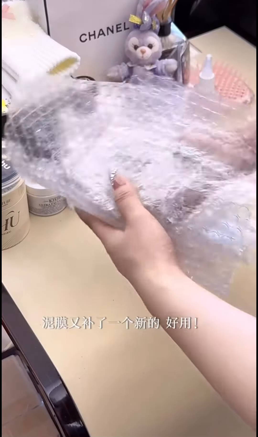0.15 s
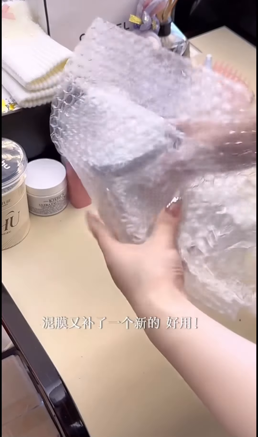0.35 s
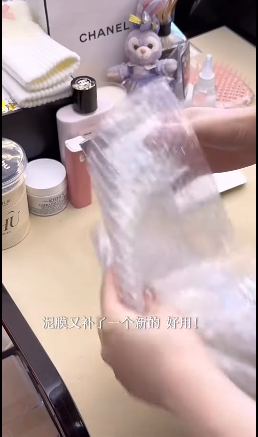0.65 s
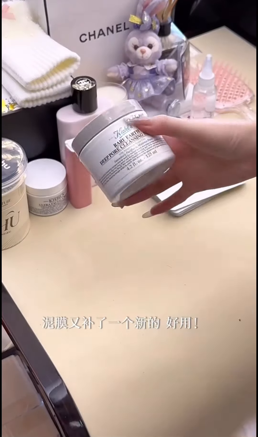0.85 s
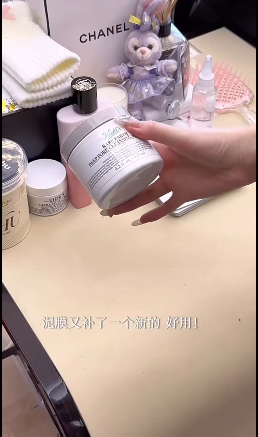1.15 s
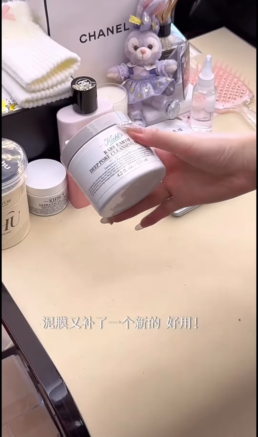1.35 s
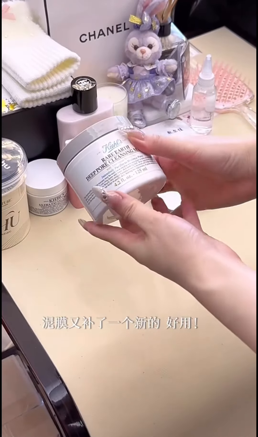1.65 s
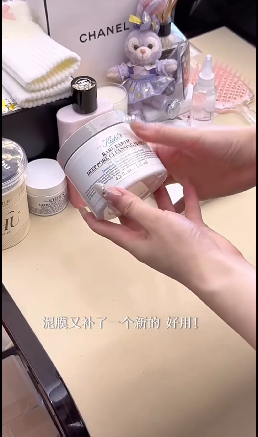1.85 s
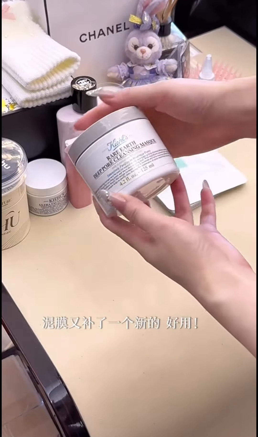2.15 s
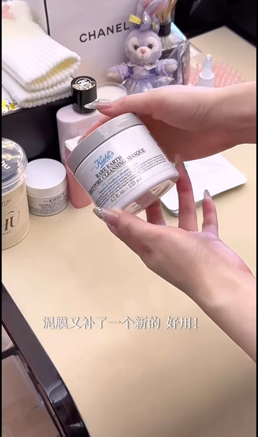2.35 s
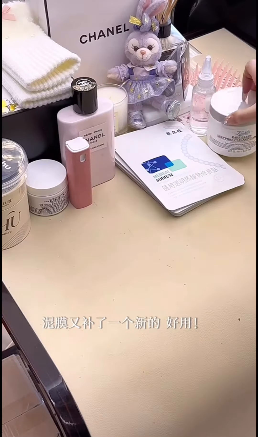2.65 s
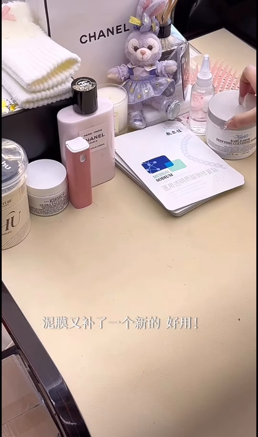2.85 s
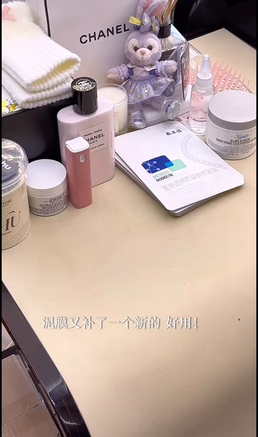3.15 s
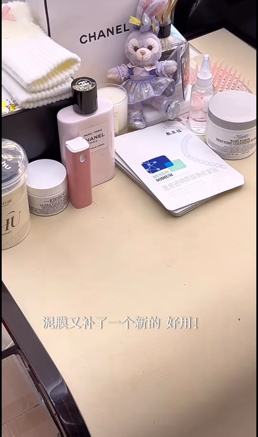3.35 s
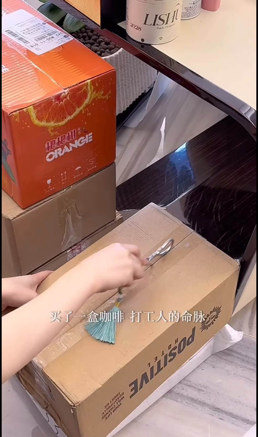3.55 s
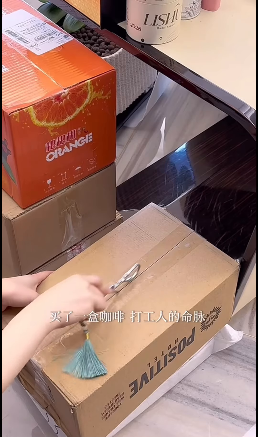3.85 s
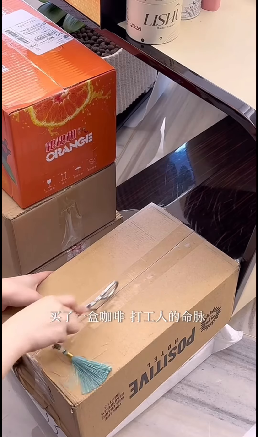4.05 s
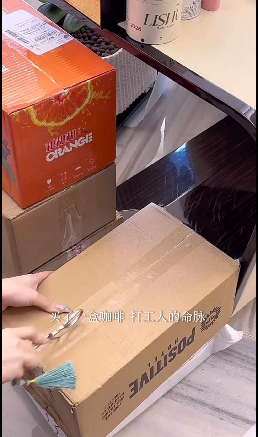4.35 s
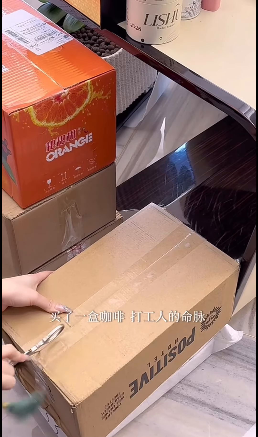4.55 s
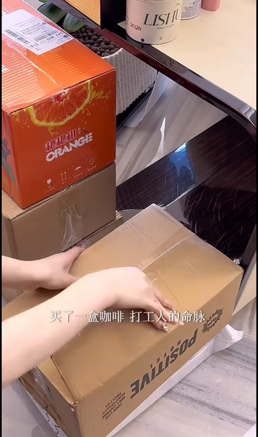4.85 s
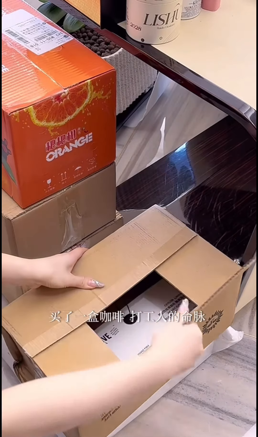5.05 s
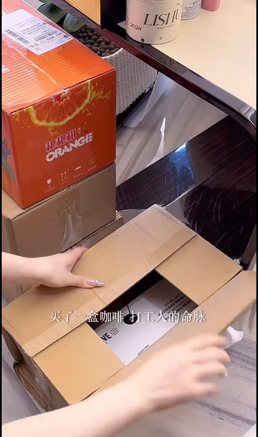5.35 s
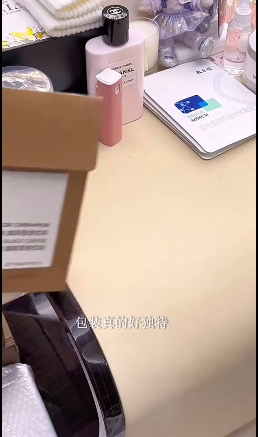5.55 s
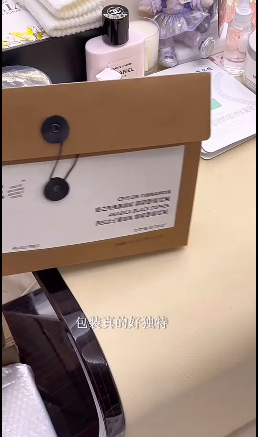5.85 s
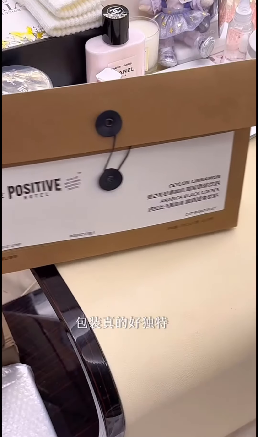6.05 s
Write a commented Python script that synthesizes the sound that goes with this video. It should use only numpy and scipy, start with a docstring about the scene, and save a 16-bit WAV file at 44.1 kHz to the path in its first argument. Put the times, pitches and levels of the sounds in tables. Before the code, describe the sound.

A close stereo microphone catches an unboxing at a desk. Bright plastic crackle comes first, then sparse nail clicks and small dull bumps of a jar. A louder section follows: hollow cardboard knocks, drumming, stick-slip sawing and tape hiss, ending in a sharp tear. Flaps scrape open, smooth packing rustles briefly, then a tick and dry paper slide, with dull room air underneath.

```python
"""Bubble wrap crackles close by as it is pulled off a cream jar; long nails tick on the jar and it is set
down. A small knife saws through the tape of a cardboard box, flaps tear loose and slide open, packing
film rustles, and a stiff paper folder is turned in the hand. Rustles and rubs are crowds of tiny clicks,
knocks are short pushes that set fading tones ringing, and a low rumble and dull air lie underneath."""
import sys
import numpy as np
from scipy import signal
from scipy.fft import rfft, irfft
from scipy.io import wavfile
from scipy.ndimage import uniform_filter1d

SR = 44100
rng = np.random.default_rng(int(sys.argv[2]) if len(sys.argv) > 2 else 0)


def wrap_up_sound(samples):
    """Save the sound to the file named by the first command line argument, as 16-bit audio."""
    columns = np.atleast_2d(samples).T
    # keep every value between -1 and 1, then stretch to whole-number steps
    tamed = np.clip(columns, -1, 1)
    steps = np.round(tamed * 32767).astype(np.int16)
    wavfile.write(sys.argv[1], SR, steps)


N = 272538
TIME = np.arange(N) / SR


def gain_of(db):
    """Turns decibels into a factor for the wave."""
    return 10 ** (np.asarray(db) / 20)


def evened(x):
    """Scales a sound to an average (rms) size of 1."""
    return x / np.sqrt(np.mean(x ** 2) + 1e-20)


def held(x, length):
    """Scales a burst so its energy equals that of an rms of 1 lasting the given length [s]."""
    return x / np.sqrt(np.sum(x ** 2) / (length * SR) + 1e-20)


def read(points, hz):
    """Reads a (frequency, value) table between its points, on a log-frequency axis."""
    f, value = np.transpose(points)
    return np.interp(np.log(hz + 1), np.log(f + 1), value)


def add(mix, s, sound):
    """Mixes a sound in at time s [s]."""
    part = mix[max(round(s * SR), 0):][:len(sound)]
    part += sound[:len(part)]


def colour(x, points, tilt_db=0, size=4096):
    """Filters with a (frequency, level) table, tilted in dB per octave, without sounding ahead of time."""
    hz = abs(np.fft.fftfreq(size, 1 / SR))
    level_db = np.maximum(read(points, hz), -80)
    level_db = level_db + tilt_db * np.log2(np.maximum(hz, 150) / 1000)  # no tilt at 1 kHz
    log_gain = np.log(gain_of(level_db))
    taps = np.fft.ifft(np.exp(np.conj(signal.hilbert(log_gain)))).real  # minimum phase
    return signal.oaconvolve(x, taps[:size // 2])[:len(x)]


def drift(n, per_s):
    """A wandering curve: random points, per_s of them each second, joined by straight lines."""
    knots = rng.standard_normal(n // 32 + 2)
    return np.interp(np.arange(n) * per_s / SR, np.arange(len(knots)), knots)


def snaps(n, per_s, spread_db):
    """Scattered clicks pushing either way, a few of them much larger."""
    size = gain_of(spread_db * np.minimum(rng.exponential(1, n), 3.5))
    happens = rng.random(n) < per_s / SR
    return size * rng.choice([-1, 1], n) * happens


def crackle(n, per_s, spread_db, cycles=2.86, count=20):
    """Snaps ring small facets of a sheet, low to high, for a few cycles; bare snaps are mixed in."""
    t, out = np.arange(512) / SR, np.zeros(n)
    for hz in np.geomspace(700, 15000, count):
        facet = np.exp(-t * hz / cycles) * np.sin(2 * np.pi * hz * t)
        clicks = snaps(n, per_s / count, spread_db)
        out += signal.oaconvolve(clicks, np.sqrt(hz) * evened(facet))[:n]
    return evened(evened(out) + 1.4 * evened(snaps(n, per_s, spread_db)))


def reshape(x, patch_db):
    """A sheet that bends changes its resonances: patches of the spectrum swell and sink."""
    z = signal.stft(x, nperseg=512, noverlap=384)[2]
    patches = rng.standard_normal(z.shape[::-1]).T
    blur = np.outer(np.hanning(12), np.hanning(20))  # over frequency, over time
    patches = evened(signal.fftconvolve(patches, blur, "same"))
    return signal.istft(z * gain_of(patch_db * np.tanh(patches)), nperseg=512, noverlap=384)[1][:len(x)]


def rub(points, per_s, spread_db, clump_db, patch_db):
    """Friction: crackle that comes in clumps, with the shifting colour of the material."""
    clumps = crackle(N, per_s, spread_db) * gain_of(clump_db * drift(N, 130))
    return evened(colour(reshape(clumps, patch_db), points))


def stroke(length, fall, size=6000):
    """Loudness curve of a burst: a quick rise, a hold and a dying tail."""
    t = np.arange(size) / SR
    return np.minimum(t / 0.00039, 1) * np.exp(-np.maximum(t - length, 0) / fall)


def ring(modes, detune=0.044, size=6000):
    """Fading tones of a struck thing; each place of contact shifts them a little."""
    t, out = np.arange(size) / SR, 0
    for hz, db, t60 in modes:
        shifted_hz = hz * (1 + detune * (2 * rng.random() - 1))
        out = out + gain_of(db - 60 * t / t60) * np.sin(2 * np.pi * shifted_hz * t)
    return out


def blows(rows, modes):
    """A soft, long contact wakes only the low tones; a hard, short one wakes them all."""
    out, t = np.zeros(N), np.arange(1024) / SR
    for s, db, contact in rows:
        u = 2 * np.pi * t / contact
        sound = signal.fftconvolve(ring(modes), u * np.exp(-u))
        sound = colour(sound, [(30, -9.5), (140, 5.0), (15000, 2.0)])  # small panels give little bass
        add(out, s, gain_of(db) * sound / abs(sound).max())
    return out


def move(start, rise, hold, db, release_db_per_s):
    """Loudness of one hand movement: it gathers speed, holds and dies away."""
    t = TIME - start
    gathering = np.clip(t / max(rise, 1e-3), 0, 1)
    return gathering * gain_of(db - release_db_per_s * np.maximum(t - rise - hold, 0))


def moves(rows, release_db_per_s):
    """Several movements of one material, adding in power."""
    return np.sqrt(sum(move(*row, release_db_per_s) ** 2 for row in rows))


# Sound colour of the bubble wrap and of the thin film: (frequency [Hz], level [dB])
WRAP_COLOUR = [(59, -24), (100, -14), (287, 0.5), (326, -4), (429, -2), (861, -4), (1800, 0), (4190, -3.5),
               (6260, -3), (7410, -6), (8230, 0), (8950, -8), (15500, -10.5)]
FILM_COLOUR = [(59, -53), (100, -20), (143, -27), (166, -4), (447, -1), (742, -6), (1520, -3), (2520, -6),
               (3180, 1), (5070, -9), (6390, 1), (8230, -0.5), (15500, -12.5)]
# Pulls on the wrap, the loose sheet creaking while it is held, and grabs at thin film and tape:
# (start time [s], rise [s], hold [s], level [dB])
WRAP_PULLS = [(0.01, .03, .24, -28.5), (0.27, 0.022, 0.1, -17.5), (0.485, 0.01, 0.033, -19.5),
              (0.57, 0.02, 0.015, -28.5), (0.98, 0.04, 0.087, -26.5), (1.252, .008, 0.081, -28.5)]
WRAP_LOOSE = [(0.0, 0.0067, 1.545, -40.5)]
FILM_GRABS = [(3.335, 0.011, 0.257, -31), (3.47, 0.028, 0.025, -24.5)]
# Folds of plastic and tape collapsing: (time [s], level [dB], length [s], brightness [dB per octave])
CRUMPLES = [(0.037, -12, 0.0033, 1.5), (0.063, -19.5, 0.0076, 6.5), (0.343, -20.5, 0.03, -1),
            (0.407, -19.5, 0.013, -1.5), (0.614, -27.5, 0.015, -5), (0.633, -19, 0.0043, 1.5),
            (0.707, -30, 0.012, -2), (0.804, -25, 0.01, -1), (1.093, -26, 0.017, -3),
            (1.255, -26.5, 0.025, -4.5), (1.307, -24.5, 0.013, 5), (1.363, -25.5, 0.038, -1),
            (3.346, -19.5, 0.0023, 4.5), (3.41, -19, 0.0031, 4), (3.421, -18, 0.0077, 1.5),
            (3.434, -16.5, 0.014, 1.5), (3.499, -17.5, 0.015, 0), (3.515, -16, 0.015, 10),
            (4.29, -23.5, 0.008, -0.5), (4.574, -27, 0.0096, 5.5), (4.632, -17.5, 0.0025, -2.5),
            (4.858, -37, 0.039, -3.5), (4.896, -31, 0.031, 15)]
WRAP_SETTLE_DB_PER_S, FILM_SETTLE_DB_PER_S = 114, 350  # the wrap goes on rustling longer


def plastic():
    """Wrap and film rustle as they move, and now and then a fold collapses."""
    out = moves(WRAP_PULLS + WRAP_LOOSE, WRAP_SETTLE_DB_PER_S) * rub(WRAP_COLOUR, 6000, 2.34, 0.95, 2.9)
    out += moves(FILM_GRABS, FILM_SETTLE_DB_PER_S) * rub(FILM_COLOUR, 12000, 5.9, 1.0, 1.8)
    for s, db, length, tilt_db in CRUMPLES:
        shape = stroke(length, 0.0031)
        fold = colour(shape * crackle(len(shape), 12000, 2.8), WRAP_COLOUR, tilt_db)
        add(out, s, gain_of(db) * held(fold, length))
    return out


# Sound colour of the low rumble and of the room's air: (frequency [Hz], level [dB])
RUMBLE_COLOUR = [(20, -31), (45, -6.5), (85, 1.5), (130, -0.5), (220, -13.5), (500, -48.5)]
AIR_COLOUR = [(60, -6), (140, 1), (300, -3), (600, -10.5), (1200, -21.5), (2500, -36), (7000, -38),
              (15000, -84)]
# Air pushed at the microphone as the wrap is swung aside: (start time [s], rise [s], hold [s], level [dB])
SWING = [(.56, .06, 0.32, -37.5)]
SWING_RELEASE_DB_PER_S = 58
RUMBLE_DB, RUMBLE_WAVER_DB, RUMBLE_WAVERS_PER_S = -41, 3, 6


def background():
    """A low rumble, stronger during the swing, under dull, wavering air; both are filtered noise."""
    swell = gain_of(RUMBLE_DB + RUMBLE_WAVER_DB * drift(N, RUMBLE_WAVERS_PER_S))
    loudness = np.hypot(swell, moves(SWING, SWING_RELEASE_DB_PER_S))
    rumble = loudness * evened(colour(rng.standard_normal(N), RUMBLE_COLOUR))
    air = evened(colour(rng.standard_normal(N), AIR_COLOUR))
    return rumble + gain_of(-42.5 + 0.81 * drift(N, 12)) * air


# Skin, plastic and board catching with a scuff or a faint squeak:
# (time [s], level [dB], length [s], centre [Hz], width [Hz])
SCUFFS = [(0.054, -30, 0.025, 2840, 700), (0.302, -37, 0.143, 452, 250), (0.143, -32, 0.062, 2290, 450),
          (1.068, -38, 0.037, 830, 398), (1.254, -33, 0.18, 400, 403), (2.29, -42.5, 0.14, 380, 397),
          (2.64, -55.5, 0.224, 1173, 30), (2.72, -37.5, 0.052, 580, 300), (3.04, -62, 0.26, 1130, 30),
          (3.203, -48.5, 0.068, 2040, 800), (3.29, -41.5, 0.035, 2040, 895), (3.411, -35.5, 0.17, 416, 160),
          (3.762, -29, 0.247, 410, 200), (4.25, -35, 0.31, 757, 171)]


def scuffs():
    """Short rubs: tiny snaps, each run heard through one resonance."""
    out = np.zeros(N)
    for s, db, length, hz, width_hz in SCUFFS:
        n = int(length * SR)
        edges = [max(hz - width_hz / 2, 40), hz + width_hz / 2]
        band = signal.butter(2, edges, "bandpass", fs=SR, output="sos")
        scuff = signal.sosfilt(band, snaps(n, 4000, 5.1)) * signal.windows.tukey(n, .5)
        add(out, s, gain_of(db) * evened(scuff))
    return out


# Sound colour of fingers on the jar and of the ticks: (frequency [Hz], level [dB])
FINGER_COLOUR = [(150, 8), (400, 22.5), (900, 12), (2200, 11), (3500, 8), (6300, 1.5), (9500, -0.5),
                 (15000, -11)]
TICK_COLOUR = [(200, 13), (700, 15), (1500, 2.5), (2800, 5), (4500, -7.5), (6500, -9.5), (10000, -22.5),
               (15500, -37)]
# Fingers shifting their grip, and skin resting on the jar: (start time [s], rise [s], hold [s], level [dB])
GRIPS = [(1.85, 0.023, 0.026, -54.5), (2.15, 0.016, 0.051, -53.5), (2.295, 0.011, 0.017, -49),
         (2.42, 0.0044, 0.032, -46.5), (2.70, 0.026, 0.029, -46.5), (3.06, 0.053, 0.025, -47.5),
         (3.19, 0.13, .03, -41)]
JAR_HELD = [(1.553, 0.079, 1.6, -64)]
# Nails and jar clicking: (time [s], level before a 12 dB cut [dB], brightness [dB per octave])
TICKS = [(1.648, -21, 4), (1.6687, -23, 5.5), (1.8793, -26, 7), (1.9032, -24, 7), (1.9739, -23.5, 4.5),
         (2.0314, -26.5, 3.5), (2.151, -32, 2), (2.4218, -9.5, 7.5), (2.4863, -16, 4.5), (2.745, -16.5, 8),
         (2.918, -36, 4), (3.0655, -36, 12), (3.1106, -22, 4), (3.1298, -28, 9), (5.734, -16.5, 3)]
# The jar and the folder bumping on hand and desk: (time [s], peak level [dB], contact time [s])
BUMPS = [(1.384, -21, .004), (1.648, -27, 0.0022), (1.974, -32, 0.0026), (2.193, -27.5, 0.00082),
         (2.305, -19.5, 0.0028), (2.424, -21, 0.0025), (2.484, -24.5, 0.0036), (2.731, -23.5, 0.0004),
         (2.795, -25.5, 0.0049), (2.935, -24, 0.0074), (3.111, -31.5, .003), (5.734, -22.5, 0.0016)]
# Tones of the jar on the desk: (frequency [Hz], level [dB], time to fade by 60 dB [s])
DESK = [(146.6, 9, 0.04), (237.4, -7, 0.2), (301, -0.5, 0.05), (452, -4, 0.11), (672, 1, 0.047),
        (1110, -5.5, 0.091), (1530, -18, .05)]
GRIP_RELEASE_DB_PER_S = 260


def jar():
    """Nails tick as short noise bursts, skin slides, and things bump on the desk."""
    out = moves(GRIPS + JAR_HELD, GRIP_RELEASE_DB_PER_S) * rub(FINGER_COLOUR, 9000, 1.6, 4.9, 2.6)
    for s, db, tilt_db in TICKS:
        shape = stroke(0.00037, 0.0017) + 0.15 * stroke(0.0033, 0.021)  # sharp tick, faint tail
        tick = colour(shape * rng.standard_normal(len(shape)), TICK_COLOUR, tilt_db)
        add(out, s, gain_of(db - 12.0) * held(tick, 0.0014))
    return out + blows(BUMPS, DESK)


# Sound colour of the rasping board and the hissing tape: (frequency [Hz], level [dB])
RASP_COLOUR = [(150, -15), (250, 1.5), (306, 6), (437, 2), (757, -8.5), (850, -6.5), (918, -17),
               (1260, -28), (1720, -12), (2500, -29), (3250, -53), (5500, -120)]
TAPE_COLOUR = [(590, -16), (1000, -0.5), (1710, -3), (2360, -3.5), (6260, -7.5), (7530, -9.5), (8060, -4.5),
               (8940, -9), (15500, -13)]
# Tones of the cardboard box: (frequency [Hz], level [dB], time to fade by 60 dB [s])
BOX = [(163, -36, .07), (189.4, 0, 0.049), (250, -31, 0.029), (345, 6, 0.064), (400, 7, 0.027),
       (574, 3, 0.061), (643, 3, 0.024), (760, 18.5, 0.0068), (1073, 2.5, 0.072), (1480, 12.5, 0.021),
       (1780, 1, 0.011), (1960, 10, 0.011), (2460, -2, 0.024), (2880, -5, 0.017)]
# The knife is pushed along the seam in a few goes:
# (start time [s], hold [s], drumming of the lid [dB], rasp of the board [dB])
PUSHES = [(3.606, 0.21, -29.5, -27), (3.873, 0.11, -26.5, -27), (4.0, 0.091, -25.5, -31.5),
          (4.104, .07, -21.5, -30.5), (4.215, 0.099, -26, -27.5), (4.362, 0.063, -21, -31.5),
          (4.47, 0.19, -27.5, -38)]
PUSH_RISE_S, PUSH_RELEASE_DB_PER_S = 0.011, 218
CUT_START_S, CUT_RISE_S, CUT_HOLD_S, CUT_RELEASE_DB_PER_S = 3.6, 0.022, 1.02, 300
# The tape hisses most where the blade runs fastest, and less before and after
FASTEST_S, HISS_DB, HISS_GROW_DB_PER_S, HISS_FADE_DB_PER_S = 4.354, -29.5, 7, 33
SHIFT_DB = -40.5  # the whole box shifting on the floor under the cut


def knife():
    """The blade sticks and slips: the lid drums, the board rasps and the tape hisses."""
    drum = signal.oaconvolve(snaps(N, 700, 3.0), ring(BOX[:4], detune=0))[:N]
    drum = colour(drum, [(90, -15.5), (190, 5.0), (250, -16), (400, -20.5), (1500, -43)])
    drum /= np.sqrt(uniform_filter1d(drum ** 2, size=1500) + 1e-12)  # the hand holds its pressure steady
    shudder_colour = [(15, 4), (35, -2), (70, 4.5), (150, -16), (400, -67)]
    shudder = evened(colour(rng.standard_normal(N), shudder_colour))  # the whole box shifts
    rasp = rub(RASP_COLOUR, 4000, 3.2, 0.8, 3.7) + gain_of(-5) * shudder
    tape = rub(TAPE_COLOUR, 14000, 2.4, 1.0, 0.49)
    lid_rows = [(s, PUSH_RISE_S, hold, db) for s, hold, db, _ in PUSHES]
    board_rows = [(s, PUSH_RISE_S, hold, db) for s, hold, _, db in PUSHES]
    pushing = moves(lid_rows, PUSH_RELEASE_DB_PER_S) * drum
    pushing += moves(board_rows, PUSH_RELEASE_DB_PER_S) * rasp
    late = TIME - FASTEST_S
    speed_db = np.minimum(HISS_GROW_DB_PER_S * late, -HISS_FADE_DB_PER_S * late)
    speed = move(CUT_START_S, CUT_RISE_S, CUT_HOLD_S, speed_db, CUT_RELEASE_DB_PER_S)
    return pushing + speed * (gain_of(HISS_DB) * tape + gain_of(SHIFT_DB) * shudder)


# The blade catching and the lid springing back: (time [s], peak level [dB], contact time [s])
KNOCKS = [(3.6195, -5.5, 0.0012), (3.629, -18, 0.0006), (3.6335, -3.5, 0.00086), (3.709, -14, 0.003),
          (3.728, -15, 0.0032), (3.887, -5.5, 0.0042), (3.947, -7, 0.0022), (3.964, -7.5, 0.0011),
          (4.168, -6, 0.0062), (4.292, -20, 0.0012), (4.571, -17.5, 0.00071), (4.635, -10, 0.0003),
          (4.639, -3.5, 0.0011), (4.644, -9.5, 0.0039), (4.668, -9.5, 0.0026), (4.912, -13.5, 0.0035)]


def knocks():
    """Each knock is a short push that sets the tones of the box ringing."""
    return blows(KNOCKS, BOX)


# Tape and flap edges tearing loose: (time [s], level [dB], length [s], slips per second [1/s],
# brightness [dB per octave], fibre crackle [dB], share of flap against box [0-1])
TEARS = [(4.631, -14.5, 0.032, 178, -2.5, -7.5, 0.7), (4.89, -12, 0.03, 240, .5, -21.5, 0.96),
         (5.232, -24.5, 0.033, 540, 7, -17, 0)]
# Tones of one loose flap: (frequency [Hz], level [dB], time to fade by 60 dB [s])
FLAP = [(220, 0.5, 0.05), (595, -7, 0.066), (660, 9, 0.02), (790, 4, 0.0082), (1210, -8, 0.051),
        (1490, -16, .025), (1700, 6, 0.011), (1910, 2.5, 0.035), (2320, -27, 0.017), (2930, -29, .015)]


def tears():
    """Edges let go in a fast, uneven run of slips that ring the box and the flap."""
    out = np.zeros(N)
    for s, db, length, per_s, tilt_db, fibre_db, share in TEARS:
        shape, share = stroke(length, 0.0054), np.clip(share, 0, 1)
        n = len(shape)
        bend_s = 0.00061 + 0.0033 * share  # a flap bends before it gives
        shape = shape * np.minimum(np.arange(n) / SR / bend_s, 1)
        turns = np.cumsum(per_s * np.exp(.35 * drift(n, 300))) / SR
        slips = np.diff(np.floor(turns + 0.966), prepend=0)  # one click per whole turn
        slips = slips + 0.065 * crackle(n, 5000, 4.0)
        board = (1 - share) * ring(BOX, detune=.015) + share * ring(FLAP, detune=0.0097)
        body = signal.fftconvolve(shape * slips, board)[:n]
        body = colour(body, [(50, -24.5), (170, 6.5), (15000, -9)], tilt_db)
        fibres = colour(shape * crackle(n, 6000, 1.0), TAPE_COLOUR)
        add(out, s, gain_of(db) * (held(body, length) + gain_of(fibre_db) * held(fibres, length)))
    return out


# Sound colour of the sliding flaps: (frequency [Hz], level [dB])
FLAP_COLOUR = [(35, -49), (60, 5.5), (170, -9.5), (229, 0), (390, -11.5), (564, -4.5), (695, -5),
               (1010, -17), (1130, -15.5), (1240, -16.5), (1750, -16), (4620, -32.5), (15000, -47.5)]
# Flaps sliding over each other: (start time [s], rise [s], hold [s], level [dB])
FLAP_SLIDES = [(4.665, 0.0091, 0.094, -33), (4.857, .012, 0.32, -33)]
FLAP_RELEASE_DB_PER_S = 170


def flaps():
    """The flaps rub as they slide over each other when lifted."""
    return moves(FLAP_SLIDES, FLAP_RELEASE_DB_PER_S) * rub(FLAP_COLOUR, 12000, 2.2, 0.39, 2.0)


# Sound colour of the packing: (frequency [Hz], level [dB])
PACKING_COLOUR = [(60, -1), (130, -6), (240, 13.5), (370, 1.5), (700, 2), (1100, -1), (1700, 5), (3000, -1),
                  (4500, -5.5), (6500, -2), (11000, 0.5), (15500, -3)]
# Packing sliding inside the box: (start time [s], rise [s], hold [s], level [dB])
PACKING_SLIDES = [(5.16, 0.08, 0.036, -36.5), (5.287, 0.011, 0.22, -31.5), (5.41, .04, 0.038, -28)]
PACKING_STOP_DB_PER_S = 750


def packing():
    """A smooth, bright hiss of fine slips."""
    return moves(PACKING_SLIDES, PACKING_STOP_DB_PER_S) * rub(PACKING_COLOUR, 20000, 1.4, 0.55, 0.82)


# Sound colour of the stiff paper: (frequency [Hz], level [dB])
FOLDER_COLOUR = [(60, -16), (150, 15.5), (400, -1.5), (800, -1), (1300, -8.5), (2700, -8.5), (3500, -15.5),
                 (4400, -9), (6300, -11.5), (9500, -21.5), (14500, -17)]
# The folder is caught, then slides through the hand: (start time [s], rise [s], hold [s], level [dB])
FOLDER_CATCH = [(5.724, 0.0088, 0.0059, -30.5)]
FOLDER_SLIDE = [(5.796, .04, 0.028, -35)]
CATCH_RELEASE_DB_PER_S, FOLDER_SLOWING_DB_PER_S = 650, 22.5


def folder():
    """Dry paper rubs against the fingers."""
    speed = moves(FOLDER_CATCH, CATCH_RELEASE_DB_PER_S) + moves(FOLDER_SLIDE, FOLDER_SLOWING_DB_PER_S)
    return speed * rub(FOLDER_COLOUR, 12000, 1.3, 0.62, 1.5)


def room(x, width, wet_db, near_t60, far_db, far_t60, size=10000, count=7):
    """Near surfaces and a room tail add depth and width; the echo pattern keeps changing."""
    t = np.arange(size) / SR
    decay = gain_of(-60 * t / near_t60) + gain_of(far_db - 60 * t / far_t60)
    decay = decay * (t > .0007)  # the first echo comes a little late
    place, echoes = TIME * 16, np.zeros((2, N))  # 16 steps per second through the echo patterns
    for k in range(count):
        share = np.sin(np.pi / 2 * np.minimum((place - k) % count, 2))  # fades in, then out
        tails = decay * rng.standard_normal((2, size)) / np.linalg.norm(decay)
        echoes += signal.oaconvolve((share * x)[None], tails, axes=1)[:, :N]
    mid, side = x + gain_of(wet_db) * echoes[0], colour(echoes[1], width)
    return np.array([mid + side, mid - side])


# Width of the reflections around the plastic, at the desk and down by the box:
# (frequency [Hz], side level [dB])
PLASTIC_WIDTH = [(60, -26), (350, -9.5), (800, -1), (1400, -4.5), (2200, -15.5), (6000, -27), (15000, -42)]
DESK_WIDTH = [(40, -20), (130, -4.5), (300, -1.5), (800, 0.5), (2200, -7), (6000, -11), (15000, -15)]
BOX_WIDTH = [(50, -15), (100, -31), (180, -8.5), (330, -9.5), (800, 0.5), (1600, -5), (3500, -3),
             (7000, -11.5), (15000, -9)]
LEFT_LEAN = .14  # direct sound added on the left and taken off the right


def scene():
    """Plastic, desk, box and flaps have their own reflections; jar, folder and background lean left."""
    wrap = room(plastic() + scuffs(), PLASTIC_WIDTH, -10.0, 0.075, 9, 0.38)
    nearby = background() + jar() + folder()
    desk = room(nearby, DESK_WIDTH, -7.5, 0.016, -8.0, 0.16) + LEFT_LEAN * np.array([nearby, -nearby])
    box = room(knife() + knocks() + tears() + packing(), BOX_WIDTH, -5.5, 0.035, -24.0, 0.29)
    # broad flaps sound from all around
    lid = room(flaps(), [(60, -10), (400, 1), (15000, -1)], -3.0, 0.041, 2, 0.31)
    return wrap + desk + box + lid


# Phase between the ears, opposed in one narrow treble band: (frequency [Hz], phase [half turns])
TWIST = [(6800, 0), (7500, .25), (7750, 1), (8450, 1), (8750, .25), (9800, 0)]
EDGE_HZ = 15750  # upper limit of the sound


def record(dry):
    """Cuts deep bass, twists one treble band between the ears, rounds the peaks and limits the treble."""
    hz = np.fft.rfftfreq(N, 1 / SR)
    bass_cut = hz ** 2 / np.sqrt(hz ** 4 + 26 ** 4)  # below about 26 Hz
    mid, side = rfft([dry[0] + dry[1], dry[0] - dry[1]]) / 2 * bass_cut
    angle = np.pi / 2 * read(TWIST, hz)  # each ear turns by half the phase, in opposite directions
    mid, side = mid * np.cos(angle), side + 1j * mid * np.sin(angle)
    wide = irfft(np.array([mid + side, mid - side]), N)
    wide = wide / (1 + (wide / .84) ** 6) ** (1 / 6)  # soft ceiling at 0.84
    low_pass = signal.firwin(511, EDGE_HZ, window=("kaiser", 9), fs=SR)
    return signal.oaconvolve(wide, low_pass[None], "same")


dry = scene()
out = record(dry)
wrap_up_sound(out)
```